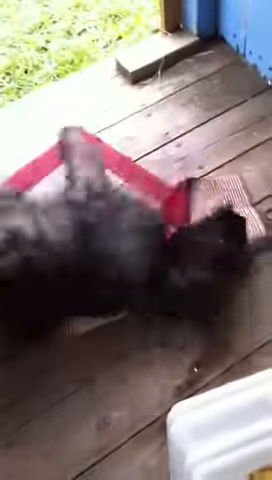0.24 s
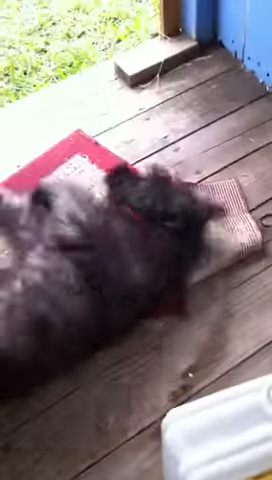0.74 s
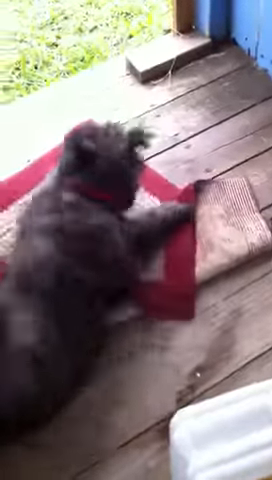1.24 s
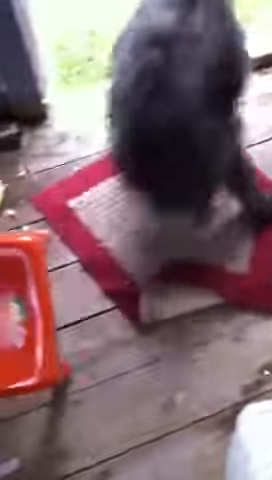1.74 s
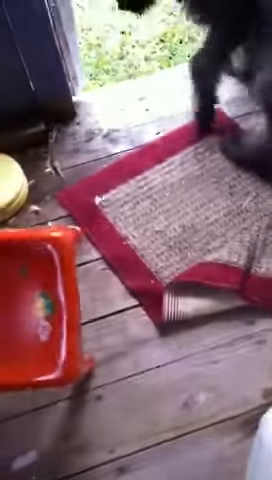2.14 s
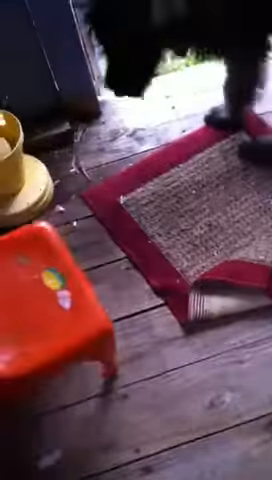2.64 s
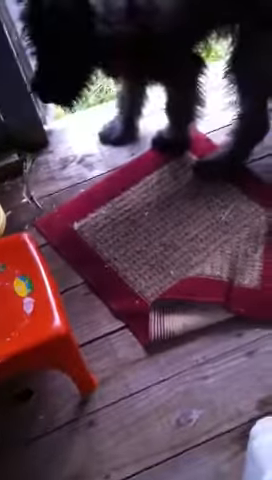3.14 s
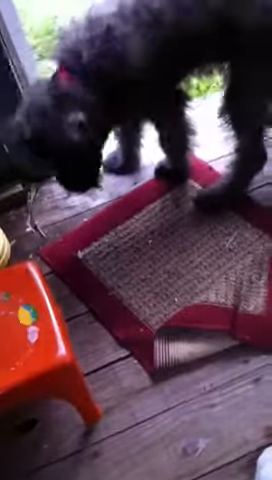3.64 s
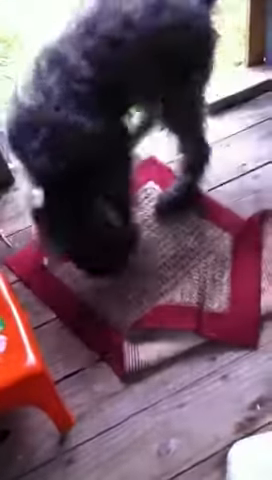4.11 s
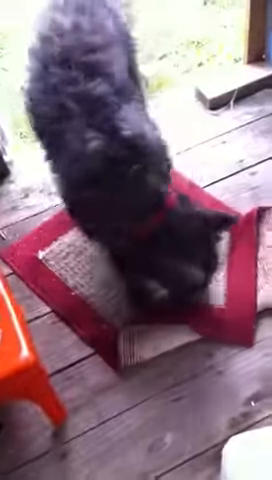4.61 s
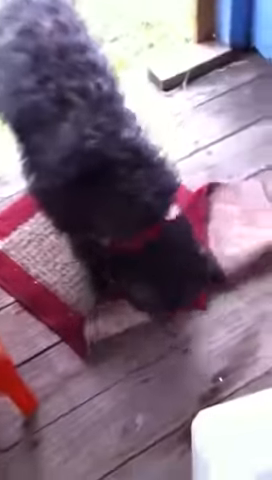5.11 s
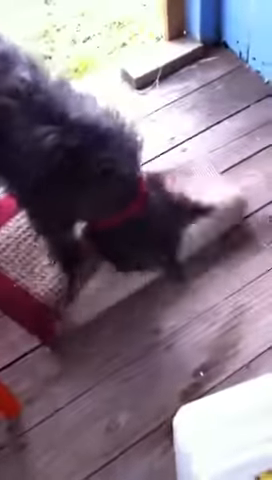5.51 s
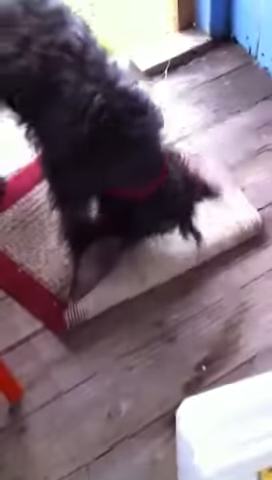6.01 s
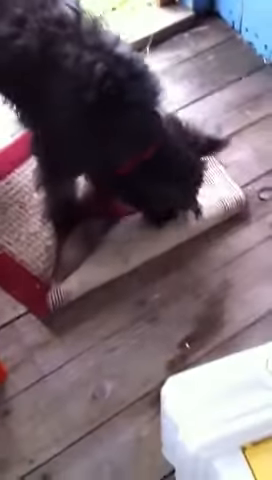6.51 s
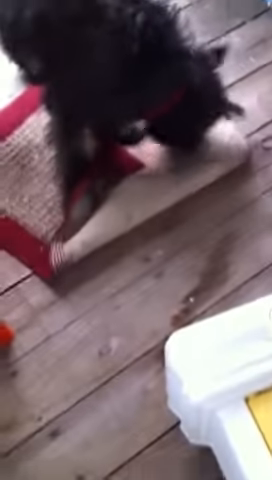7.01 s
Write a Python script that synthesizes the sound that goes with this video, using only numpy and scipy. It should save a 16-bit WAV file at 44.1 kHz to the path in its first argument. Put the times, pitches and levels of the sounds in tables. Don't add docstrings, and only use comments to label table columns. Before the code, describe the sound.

Close up on a wooden porch, a puppy rolls on a woven mat: rapid hollow knocks, padded thuds, claw scratches and short board squeaks over rumbling, rasping mat drags. It scrambles up with hard thumps, steps back and lands heaviest just before three seconds. After a lull, only faint taps, soft steps and dry scuffs remain over a low outdoor hum. Single-channel handheld microphone, slight hiss.

```python
import sys
import numpy as np
from scipy import signal
from scipy.fft import rfft, irfft, next_fast_len
from scipy.io import wavfile
from scipy.ndimage import uniform_filter1d

SR = 44100
rng = np.random.default_rng(int(sys.argv[2]) if len(sys.argv) > 2 else 0)


def volts_from_decibels(level):
    exponent = np.asarray(level, float) / 20
    return 10 ** exponent


def store_wav(level_fs):
    pcm = np.round(np.clip(np.atleast_2d(level_fs), -1, 1) * 32767)
    wavfile.write(sys.argv[1], SR, pcm.T.astype(np.int16))


N = 319927


def rms_one(x):
    return x / np.sqrt(np.mean(x ** 2) + 1e-20)


def peak_one(x):
    return x / np.abs(x).max()


def add(out, time_s, sound):
    at = round(time_s * SR)
    out[at:at + len(sound)] += sound[:N - at]


def highpass(x, order, cutoff_hz):
    return signal.sosfilt(signal.butter(order, cutoff_hz, "high", fs=SR, output="sos"), x)


def coloured(x, spectrum):
    size = next_fast_len(len(x))
    hz, db = np.transpose(spectrum)
    grid_hz = np.arange(size // 2 + 1) * SR / size + 1
    gain = volts_from_decibels(np.interp(np.log(grid_hz), np.log(hz), db))
    return rms_one(irfft(rfft(x, size) * gain, size)[:len(x)])


def drift(rate_hz):
    r = np.exp(-2 * np.pi * rate_hz / SR)
    slow = signal.lfilter([1], [1, -2 * r, r * r], rng.standard_normal(N + SR))
    return rms_one(slow[SR:])


def resonate(x, hz, width_hz):
    r = np.exp(-np.pi * width_hz / SR)
    poles = [1, -2 * r * np.cos(2 * np.pi * hz / SR), r * r]
    return signal.lfilter([(1 - r * r) / 2, 0, (r * r - 1) / 2], poles, x)


def grains(per_s, spread_db):
    sizes = volts_from_decibels(spread_db * np.minimum(rng.exponential(1, N), 4)) * rng.choice([-1, 1], N)
    return sizes * (rng.random(N) < per_s / SR) + 1e-18


def contact(t60_s, rise_s):
    t = np.arange(SR // 4) / SR
    return (1 - np.exp(-t / rise_s)) ** 2 * volts_from_decibels(-60 * t / np.clip(t60_s, .02, .4))


# (frequency [Hz], level [dB])
AIR_COLOUR = [(15, -71.5), (25, -33.5), (58, -27.5), (76, -18), (170, -3), (309, -11.5), (427, -14.5),
              (489, -16), (818, -19), (988, -23.5), (1070, -24), (1890, -24.5), (2220, -26.5),
              (3920, -26.5), (16000, -33)]
AIR_DB = -63


def outdoor_air():
    return volts_from_decibels(AIR_DB + 0.67 * drift(3)) * coloured(rng.standard_normal(N), AIR_COLOUR)


# (delay [s], level [dB])
PORCH_ECHOES = [
    (.011, -17),
    (.019, -14),
    (0.029, -18),
    (0.046, -24),
]


def porch(x):
    out = x.copy()
    dull = signal.lfilter([.3], [1, -.7], x)
    for delay_s, db in PORCH_ECHOES:
        add(out, delay_s, volts_from_decibels(db) * dull)
    return out


# (time [s], peak [dB])
FRAME_JOLTS = [(0.119, -55), (0.689, -74), (1.129, -63), (1.439, -50), (1.619, -64), (1.739, -69),
               (1.899, -54), (2.059, -74), (2.689, -57), (2.909, -46), (3.059, -66)]
JOLT_GAIN_DB, JOLT_PUSH_S = 3, .005


def jolts():
    out = np.zeros(N)
    t = np.arange(SR // 4) / SR / JOLT_PUSH_S
    push = peak_one(t * (2 - t) * np.exp(-t))
    for time_s, peak_db in FRAME_JOLTS:
        add(out, time_s, volts_from_decibels(peak_db + JOLT_GAIN_DB) * push)
    return out


SOFT_BLOW_DB = -25


def aftershake(hits, db, t60_s, follows):
    out = np.zeros(N)
    for time_s, peak_db, *_ in hits:
        held_back_db = (1 - follows) * max(peak_db - SOFT_BLOW_DB, 0)
        add(out, time_s, volts_from_decibels(peak_db + db - held_back_db) * contact(t60_s, 0.0027))
    return out


# (crest time [s], rasp [dB], swell [s], fade [s], weave over rasp [dB])
MAT_SLIDES = [(0.04, -46, 0.19, 0.2, -19), (0.2, -54.5, .08, 0.089, -15.5), (0.328, -49.5, 0.13, 0.33, -14),
              (0.52, -46, .25, 0.3, -16.5), (0.77, -44, 0.16, 0.28, -17), (0.94, -34, 0.11, 0.2, -21),
              (1.22, -55, 0.19, 0.28, -10.5), (1.391, -43, 0.17, .15, -18), (1.548, -33.5, 0.18, 0.14, -19),
              (1.75, -43.5, 0.082, 0.1, -11), (1.85, -46.5, .12, 0.42, -20), (2.12, -45, 0.16, 0.2, -15),
              (2.19, -45, .08, .1, -17), (2.26, -44.5, .17, 0.13, -17.5), (2.44, -59.5, 0.26, 0.18, -19.5),
              (2.79, -40.5, 0.067, 0.084, -19.5), (2.92, -40.5, 0.09, 0.17, -22),
              (3.12, -42.5, 0.12, 0.12, -21), (3.3, -61, 0.26, 0.43, -14), (4.06, -57.5, .03, 0.074, -13),
              (4.23, -59, .06, .08, -16), (4.32, -53.5, 0.072, 0.099, -16.5), (4.36, -54.5, .05, .05, -12),
              (4.405, -54, 0.048, 0.045, -13), (4.5, -62, 0.096, 0.17, -15.5), (4.82, -61.5, .2, 0.12, -20),
              (5.12, -59.5, .04, 0.17, -14), (5.23, -56.5, .06, 0.1, -13), (5.34, -50, 0.11, 0.13, -16.5),
              (5.41, -51, 0.12, 0.092, -14.5), (5.549, -59, 0.19, 0.26, -15),
              (5.768, -51, 0.035, 0.066, -17), (5.85, -66, .1, .2, -18), (6.8, -65, .3, .3, -22)]
SLIDE_DROP_DB = 20
SLIDE_CURVE = 2.2
RUMBLE_DB, DRUMMING_DB = -8, -12.5
SHUDDER_DB, SHUDDER_T60_S, SHUDDER_FOLLOWS = -23.5, .3, 0.93
CHATTER_DB, CHATTER_T60_S, CHATTER_FOLLOWS = -16.5, 0.19, 0.79


def drag_levels():
    rasp, hiss = np.zeros((2, N))
    for crest_s, db, swell_s, fade_s, weave_db in MAT_SLIDES:
        start = max(round((crest_s - 2 * swell_s) * SR), 0)
        stop = min(round((crest_s + 2 * fade_s) * SR), N)
        near = slice(start, stop)
        t = np.arange(start, stop) / SR
        distance = np.maximum((crest_s - t) / swell_s, (t - crest_s) / fade_s)
        gain = volts_from_decibels(db - SLIDE_DROP_DB * distance ** SLIDE_CURVE)
        rasp[near] = np.maximum(rasp[near], gain)
        hiss[near] = np.maximum(hiss[near], volts_from_decibels(weave_db) * gain)
    soft_hits = PAD_THUDS + LIGHT_STEPS
    hard_hits = ROLLING_KNOCKS + RISING_KNOCKS + CLAW_TAPS + WEIGHT_LANDINGS
    rumble = volts_from_decibels(RUMBLE_DB) * rasp + aftershake(soft_hits, SHUDDER_DB, SHUDDER_T60_S, SHUDDER_FOLLOWS)
    drumming = volts_from_decibels(DRUMMING_DB) * rasp + aftershake(hard_hits, CHATTER_DB, CHATTER_T60_S, CHATTER_FOLLOWS)
    return rumble, drumming, rasp, hiss


# (frequency [Hz], level [dB per Hz])
WEAVE_COLOUR = [(1470, -22), (2500, 2.5), (4650, -3), (5350, -0.5), (7080, -3.5), (9290, -6), (15000, -9),
                (16000, -25)]


def weave_hiss(push):
    fibres = coloured(grains(8100, spread_db=-2.5), WEAVE_COLOUR)
    return push * volts_from_decibels(5.5 + 1.9 * drift(30)) * fibres


# (frequency [Hz], level [dB per Hz])
RASP_COLOUR = [(470, -37), (800, -0.5), (1140, -3), (1270, -2.5), (1640, -1.5), (2080, -5.5), (2510, -7),
               (4500, -15), (5850, -42.5), (9900, -120)]
PATCH_SWELL_DB, PATCH_RATE_HZ = 1.7, 6.7


def mat_rasp(push):
    rub = grains(5000, spread_db=-4.0)
    clumps = np.zeros(N)
    for k, hz in enumerate(600 * 2 ** np.arange(0, 3.3, .4)):
        swell = volts_from_decibels(PATCH_SWELL_DB * drift(PATCH_RATE_HZ))
        clumps += (-1) ** k * swell * resonate(rub, hz, 0.46 * hz) / np.sqrt(hz)
    return push * volts_from_decibels(-8.5 + 0.67 * drift(25)) * coloured(clumps, RASP_COLOUR)


def planks(modes, push, per_s, spread_db, wander_db):
    padding = signal.butter(2, 0.93 * modes[-1][0], fs=SR, output="sos")
    force = signal.sosfilt(padding, grains(per_s, spread_db))
    steady, driven = np.zeros((2, N))
    for k, (hz, width_hz, db) in enumerate(modes):
        mode_force = (-1) ** k * force * volts_from_decibels(db + wander_db * drift(9))
        steady += resonate(mode_force, hz, width_hz)
        driven += resonate(mode_force * push, hz, width_hz)
    return driven / np.sqrt(np.mean(steady ** 2))


# (time [s], peak [dB], frequency [Hz], length [s])
BOARD_SQUEAKS = [(0.695, -34, 2170, 0.024), (0.701, -37, 1165, 0.037), (0.749, -40, 2160, 0.035),
                 (0.825, -40, 717, 0.063), (0.852, -40, 696, 0.072), (0.876, -41, 1400, 0.1),
                 (0.927, -35, 1144, 0.026), (0.964, -37, 628, 0.048), (1.008, -35.5, 1690, 0.049),
                 (1.045, -34, 858, .04), (1.111, -35.5, 1610, 0.032), (1.131, -21.5, 1095, 0.02),
                 (1.205, -44, 616, 0.023), (1.446, -23, 1334, 0.019), (1.508, -39, 1290, 0.033),
                 (1.552, -35.5, 1740, 0.054), (1.583, -35, 1180, 0.019), (1.625, -39, 860, 0.022),
                 (1.719, -39.5, 1000, 0.028), (1.826, -39, 860, 0.027), (1.897, -27.5, 1178, .018),
                 (2.027, -45, 1240, 0.035), (2.082, -34, 917, 0.038), (4.042, -57.5, 1800, .06),
                 (4.053, -58, 945, .035), (4.205, -61, 1220, .03), (4.219, -60, 925, 0.05),
                 (4.294, -61, 2400, .02), (4.389, -55, 963, 0.032), (4.398, -52, 1490, 0.035),
                 (4.759, -66, 379, 0.031), (4.858, -63, 443, .03), (5.301, -57, 698, 0.056),
                 (5.346, -52.5, 600, 0.046), (5.503, -54.5, 545, 0.018), (5.523, -50, 784, .025),
                 (5.67, -57, 765, .035), (5.759, -50, 1322, 0.029), (5.751, -55, 705, 0.042)]
# (time [s], peak [dB], frequency [Hz], length [s])
MORE_BOARD_SQUEAKS = [ (0.012, -48.5, 795, 0.054), (0.065, -46.5, 840, 0.082), (0.121, -20, 302, .04),
                      (0.17, -41, 291, .06), (0.15, -38, 850, 0.041), (0.38, -52, 600, .04),
                      (0.43, -46.5, 232, .04), (0.477, -48, 302, .04), (1.749, -34, 655, 0.047),
                      (1.81, -32, 633, 0.032), (2.1, -37.5, 716, 0.022), (2.02, -43, 896, 0.017),
                      (2.914, -23, 1007, 0.019), (4.57, -52, 696, 0.018), (4.572, -59, 1200, .02),
                      (0.69, -31, 745, 0.029), (1.1, -37, 746, 0.037), (1.144, -27, 802, 0.035),
                      (2.261, -40, 1496, 0.027), (0.131, -23, 557, .02), (0.128, -25, 1046, 0.024),
                      (0.134, -23.5, 285, .02), (0.04, -45.5, 1050, 0.045), (0.22, -50, 280, 0.041),
                      (0.58, -48.5, 199, 0.074), (1.03, -35, 1150, 0.038), (1.02, -32.5, 272, .04),
                      (1.141, -25, 1086, .02), (1.165, -34, 280, 0.048), (1.922, -26, 237, .03),
                      (1.915, -34, 1240, .025), (2.868, -32, 1750, .02), (2.913, -26.5, 1400, .015),
                      (3.04, -39, 1100, 0.052), (2.975, -24.5, 235, .025), (3.012, -28.5, 250, 0.023),
                      (4.395, -56, 3400, .03), (4.34, -62, 2900, .03), (5.795, -52, 205, .02),
                      (0.115, -36, 125, .05), (1.74, -45, 115, .05), (2.065, -45, 120, .05),
                      (0.124, -28, 1550, .025), (0.127, -31, 2200, .02), (0.829, -28, 250, .025),
                      (0.946, -23, 225, .02), (1.535, -30, 560, .015), (1.505, -40, 2750, .025),
                      (1.555, -39, 2400, .02), (1.405, -46, 2000, .04), (1.315, -42, 1500, .03),
                      (0.775, -44, 1300, .03)]
SQUEAK_WIDTH = 0.057


def squeaks():
    out = np.zeros(N)
    for time_s, peak_db, hz, length_s in BOARD_SQUEAKS + MORE_BOARD_SQUEAKS:
        width_hz = SQUEAK_WIDTH * hz
        rub = rng.standard_normal(SR // 4)
        tone = resonate(resonate(rub, hz, width_hz), hz, width_hz)
        size = np.sqrt(uniform_filter1d(tone ** 2, size=600) + 1e-12)
        held = tone / size ** 1.2
        add(out, time_s - .003, volts_from_decibels(peak_db) * peak_one(held * contact(2.3 * length_s, 0.14 * length_s)))
    return out


# (time [s], peak [dB], fizz [dB], t60 [s])
CLAW_SCRATCHES = [(0.115, -25, -52, 0.11), (0.502, -38.5, -52.5, 0.16), (0.7019, -36.5, -47.5, 0.16),
                  (0.752, -33.5, -58, 0.14), (0.93, -27.5, -48, 0.091), (0.984, -36.5, -57, 0.14),
                  (1.0077, -34, -39, 0.15), (1.1282, -17.5, -10.5, 0.058), (1.15, -32, -34, 0.1),
                  (1.288, -47, -55, 0.12), (1.3096, -42, -44, 0.12), (1.4393, -16, -59, 0.089),
                  (1.503, -27, -52, 0.072), (1.553, -33, -34, 0.28), (1.578, -28, -40.5, 0.16),
                  (1.613, -73, -34.5, 0.17), (1.747, -45, -35, 0.13), (1.895, -23, -45, 0.15),
                  (2.02, -45.5, -43, 0.32), (2.054, -41, -43.5, 0.17), (2.0751, -37, -50.5, 0.21),
                  (2.257, -59, -56, 0.11), (2.6905, -26.5, -40.5, 0.096), (2.7854, -30.5, -35, 0.11),
                  (2.856, -25.5, -41, 0.21), (2.881, -22.5, -38, 0.11), (2.9108, -46.5, -36, 0.088),
                  (2.988, -34, -45.5, 0.14), (3.04, -39.5, -48, 0.45), (3.0891, -40, -59, 0.049)]
# (time [s], peak [dB], fizz [dB], splinter [Hz])
LIGHT_SCUFFS = [(1.102, -20, -36.5, 3670), (2.489, -54, -75, 992), (2.866, -29, -42, 4620),
                (3.859, -52.5, -64.5, 1000), (4.055, -52, -69, 1800), (4.1414, -57, -59, 5730),
                (4.2941, -58, -68.5, 2390), (4.3913, -39, -60, 1470), (4.643, -57, -60, 2470),
                (4.857, -52.5, -72.5, 1760), (5.0983, -45, -47, 5160), (5.218, -51, -46.5, 3300),
                (5.3875, -68, -45, 1400), (5.53, -55, -55.5, 1750), (5.757, -55, -68, 1305)]
# (frequency [Hz], level [dB per Hz])
CRACK_COLOUR = [(880, -16.5), (1500, -8.5), (2920, -11.5), (4570, -14.5), (5140, -17.5), (9060, -30),
                (9790, -32.5), (12900, -32), (15500, -38)]
SPLINTER_HZ, SPLINTER_HZ_PER_DB = 1739, 41.5
CLAW_RISE_S, CLAW_SPLINTER_DB = 0.002, -3.5
SCUFF_T60_S, SCUFF_RISE_S, SCUFF_SPLINTER_DB = 0.088, 0.0024, -3.0


def scratches():
    bite, fizz, splinters = np.zeros((3, N))
    scrapes = []
    for time_s, db, fizz_db, t60_s in CLAW_SCRATCHES:
        hz = SPLINTER_HZ + SPLINTER_HZ_PER_DB * max(fizz_db - db + 14.0, 0)
        scrapes.append((time_s, db, fizz_db, t60_s, hz, CLAW_RISE_S, CLAW_SPLINTER_DB))
    for time_s, db, fizz_db, hz in LIGHT_SCUFFS:
        scrapes.append((time_s, db, fizz_db, SCUFF_T60_S, hz, SCUFF_RISE_S, SCUFF_SPLINTER_DB))
    for time_s, peak_db, fizz_db, t60_s, hz, rise_s, tone_db in scrapes:
        start_s = time_s - .0011
        envelope = contact(t60_s, rise_s)
        force = volts_from_decibels(peak_db - 8.0) * envelope
        tone = rms_one(resonate(rng.standard_normal(len(force)), hz, 0.059 * hz))
        add(bite, start_s, force)
        add(fizz, start_s, volts_from_decibels(fizz_db - 8.5) * envelope)
        add(splinters, start_s, volts_from_decibels(tone_db) * force * tone)
    grit = coloured(grains(6000, spread_db=1.5), CRACK_COLOUR)
    fine_colour = [(3500, -28.0), (6000, 0.5), (10000, -0.5), (15500, -8.5), (16500, -28.5)]
    fine = coloured(grains(5600, spread_db=3.5), fine_colour)
    return bite * grit + splinters + fizz * fine


SNAP = 5.06


def rattle(modes, t60_s, rise_s):
    push = rng.standard_normal(SR // 4) * contact(t60_s, rise_s)
    push[round(rise_s * SR)] += SNAP * np.sqrt(np.sum(push ** 2)) / 10
    rings = np.zeros(len(push))
    for hz, width_hz, db in modes:
        rings += volts_from_decibels(db + rng.normal(0, 3.1)) * resonate(push, hz, width_hz)
    padding = signal.butter(2, 1.2 * modes[-1][0], fs=SR, output="sos")
    return peak_one(signal.sosfilt(padding, rings))


BEAT_HZ = 41.4


def blow(hz, t60_s, modes, rise_s, others_db, beat=0.2):
    t = np.arange(SR // 4) / SR
    offset = rng.choice([-1, 1]) * BEAT_HZ * (t - .006)
    pair = np.sin(2 * np.pi * hz * t) + beat * np.sin(2 * np.pi * (hz * t + offset))
    tone = peak_one(pair * contact(t60_s, rise_s))
    return peak_one(tone + volts_from_decibels(others_db) * rattle(modes, t60_s, rise_s))


# (time [s], peak [dB], ring [Hz])
PAD_THUDS = [(0.113, -25.5, 236), (0.122, -25, 294), (0.689, -26, 263), (0.74, -22, 231),
             (0.785, -22.5, 257.6), (0.811, -22, 261), (0.842, -28.5, 230), (0.904, -25.5, 212),
             (0.937, -23, 196), (0.97, -28, 230), (1.129, -29, 196), (1.339, -33.5, 131),
             (1.417, -22.5, 240), (1.437, -23.5, 179), (1.521, -31, 198), (1.552, -31, 230),
             (1.584, -25, 226), (1.62, -36, 226), (1.738, -23.5, 194), (1.903, -28, 254),
             (1.944, -24.5, 204), (2.017, -31.5, 236), (2.056, -29, 170), (2.691, -26.5, 185),
             (2.878, -26.5, 170), (2.91, -21, 205), (2.973, -21.5, 230), (3.011, -30, 248),
             (3.056, -23, 223), (3.093, -28.5, 283)]
# (time [s], peak [dB], ring [Hz])
LIGHT_STEPS = [(0.037, -45, 306), (0.077, -45, 326), (0.44, -47, 274), (1.1, -34.5, 190), (1.2, -35.5, 175),
               (1.295, -42, 318), (1.39, -41, 170.7), (1.811, -34.5, 200), (2.148, -63, 229),
               (2.257, -38.5, 188), (2.293, -40, 240), (2.424, -40.5, 200), (2.794, -38.5, 302),
               (2.858, -32, 200), (4.058, -48, 186), (4.337, -36.5, 228), (4.561, -53, 215),
               (4.646, -46, 222), (5.334, -48.5, 278), (5.394, -42.5, 229), (5.516, -45, 227),
               (5.782, -58, 229)]
# (frequency [Hz], width [Hz], level [dB])
LOW_PLANK_MODES = [(133.6, 35, -11), (209, 30, -6.5), (231, 31, -4), (300, 27, -7.5)]
THUD_T60_S, STEP_T60_S = 0.1, 0.093


def thuds():
    out = np.zeros(N)
    for hits, t60_s in [(PAD_THUDS, THUD_T60_S), (LIGHT_STEPS, STEP_T60_S)]:
        for time_s, peak_db, hz in hits:
            thud = blow(hz, t60_s, LOW_PLANK_MODES, rise_s=0.0039, others_db=-3.0, beat=0.16)
            add(out, time_s - .004, volts_from_decibels(peak_db + 0.5) * thud)
    return out


# (time [s], peak [dB], ring [Hz], overtone [dB])
ROLLING_KNOCKS = [(0.117, -28, 477, -25), (0.686, -23, 596, -32.5), (0.694, -20, 445, -28.5),
                  (0.727, -22, 472, -38), (0.759, -19, 449, -48), (0.784, -21.5, 447, -61),
                  (0.809, -16.5, 490, -62), (0.867, -26, 468, -57), (0.899, -15, 437, -36),
                  (0.933, -17.5, 485, -49), (0.965, -20, 505, -53), (1.011, -22.5, 503, -31),
                  (1.044, -23, 429.6, -41), (1.068, -22, 490, -39), (1.205, -28, 420, -42),
                  (1.265, -39, 505, -81.5), (1.309, -28.5, 490, -36), (1.34, -38, 600, -51.5)]
# (time [s], peak [dB], ring [Hz], overtone [dB])
RISING_KNOCKS = [(1.464, -23, 717, -42), (1.519, -23, 548, -32), (1.581, -18, 555, -24.5),
                 (1.628, -29, 444, -46), (1.716, -22, 515, -41), (1.741, -18.5, 400, -56),
                 (1.796, -21, 448, -50), (1.819, -24, 601, -35.5), (1.968, -29, 443, -60),
                 (2.016, -54, 333, -50), (2.061, -24.5, 338, -39), (2.084, -59, 917, -33.5),
                 (2.258, -20.5, 577, -39), (2.71, -26.5, 496, -40), (2.788, -17, 557, -23.5),
                 (2.857, -25, 481, -35.5), (2.866, -15.5, 470, -31.5), (2.929, -15, 460, -37),
                 (2.969, -18.5, 425, -57), (2.99, -18, 422, -29.5), (3.057, -16, 436, -39),
                 (3.055, -27, 676, -44), (3.078, -25, 444, -67), (3.159, -37, 438, -66),
                 (3.214, -41.5, 432, -68)]
# (time [s], peak [dB], ring [Hz], overtone [dB])
CLAW_TAPS = [
    (0.502, -39.5, 536, -51),
    (4.23, -56, 617, -61),
    (4.569, -46, 380, -52),
    (5.207, -42, 445, -71.5),
    (5.397, -46, 342, -47),
    (5.524, -46, 590, -51),
    (5.67, -51, 438, -59),
    (5.76, -43.5, 445, -48),
]
# (frequency [Hz], width [Hz], level [dB])
HOLLOW_MODES = [(380, 60, -2.5), (445, 28, 6), (490, 37, 7), (578, 199.2, 2.5), (662.3, 53, 4.5),
                (691.6, 16, -4), (830, 180, -18.5)]
# (frequency [Hz], width [Hz], level [dB])
SURFACE_MODES = [(900, 840, 1.5), (1141, 150, -2), (1400, 200, -24.5), (2177, 210, -18.5)]
KNOCK_T60_S, KNOCK_RISE_S = 0.078, 0.0011
BLUNT_DB, BRIGHT_DAMPING_PER_DB = -45, 0.0083


def knocks():
    out = np.zeros(N)
    for time_s, peak_db, hz, overtone_db in ROLLING_KNOCKS + RISING_KNOCKS + CLAW_TAPS:
        t60_s = KNOCK_T60_S * (1 - BRIGHT_DAMPING_PER_DB * (overtone_db - BLUNT_DB))
        ring = blow(hz, t60_s, HOLLOW_MODES, KNOCK_RISE_S, others_db=-4.5)
        overtones = rattle(SURFACE_MODES, 2.3 * t60_s, KNOCK_RISE_S)
        add(out, time_s - .0025, volts_from_decibels(peak_db - 4.0) * ring)
        add(out, time_s - .0021, volts_from_decibels(overtone_db + 1.0) * overtones)
    return out


# (time [s], peak [dB], ring [Hz], overtone [dB], rise [s])
WEIGHT_LANDINGS = [
    (0.122, -23, 600, -16, 0.0051),
    (1.132, -10.5, 490, -24, 0.0011),
    (1.44, -13, 547, -17.5, 0.00086),
    (2.692, -15.5, 530, -30, 0.0027),
    (1.897, -20.5, 557, -23, 0.00032),
    (2.908, -4, 436, -21, 0.0053),
]
LANDING_T60_S, LANDING_OTHERS_DB = 0.038, -4


def landings():
    out = np.zeros(N)
    for time_s, peak_db, hz, overtone_db, rise_s in WEIGHT_LANDINGS:
        ring = blow(hz, LANDING_T60_S, HOLLOW_MODES, rise_s, LANDING_OTHERS_DB)
        overtones = rattle(SURFACE_MODES, 2.6 * LANDING_T60_S, rise_s)
        add(out, time_s - .0025, volts_from_decibels(peak_db) * ring)
        add(out, time_s - .0021, volts_from_decibels(overtone_db + 2.5) * overtones)
    return out


RADIATE_HZ = 113


def scene():
    rumble, drumming, rasp, hiss = drag_levels()
    drag = planks(LOW_PLANK_MODES, rumble, per_s=610, spread_db=3.5, wander_db=5.0)
    drag += planks(HOLLOW_MODES, drumming, per_s=900, spread_db=2.2, wander_db=3.5)
    wood = highpass(drag + knocks() + thuds() + landings(), 4, RADIATE_HZ)
    on_boards = wood + mat_rasp(rasp) + scratches() + highpass(squeaks(), 2, 95)
    mix = porch(on_boards) + jolts() + weave_hiss(hiss) + outdoor_air()
    return mix[None]


def top_cut(x):
    return signal.sosfilt(signal.butter(12, 15850, fs=SR, output="sos"), x)


MIC_HISS_DB = -82.5


def record(dry):
    hissy = dry + volts_from_decibels(MIC_HISS_DB) * rng.standard_normal(dry.shape)
    return top_cut(hissy)


dry = scene()
out = record(dry)
store_wav(out)
```